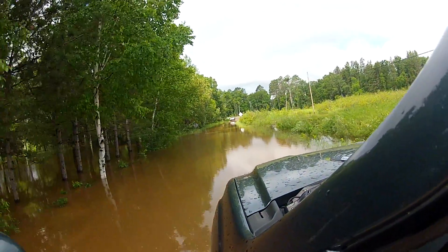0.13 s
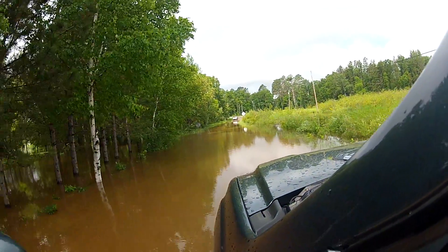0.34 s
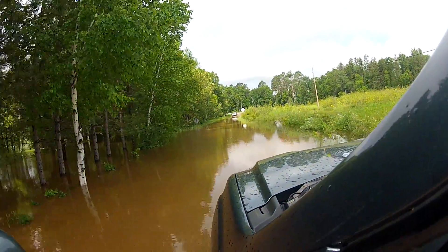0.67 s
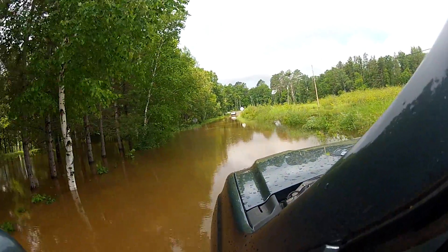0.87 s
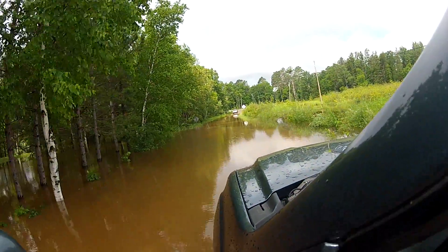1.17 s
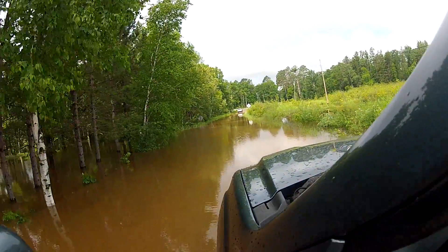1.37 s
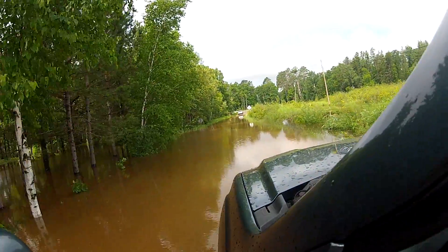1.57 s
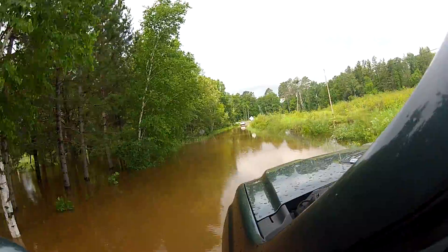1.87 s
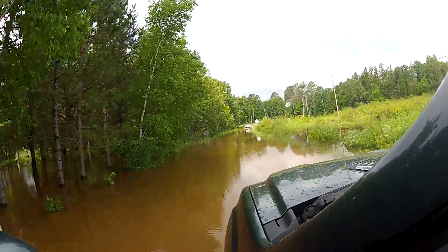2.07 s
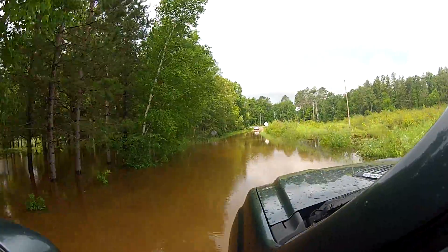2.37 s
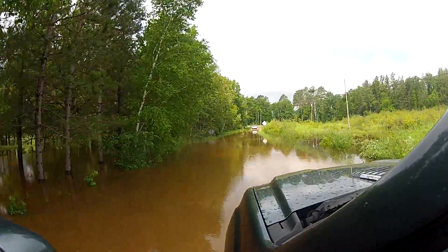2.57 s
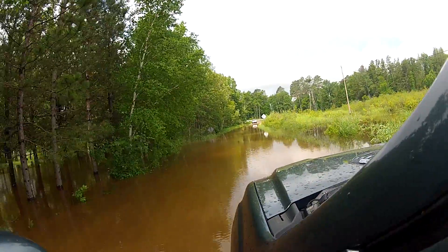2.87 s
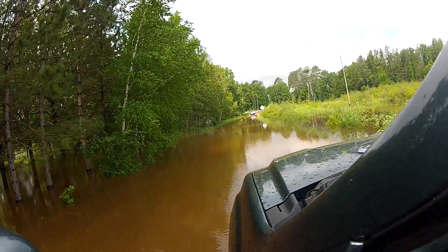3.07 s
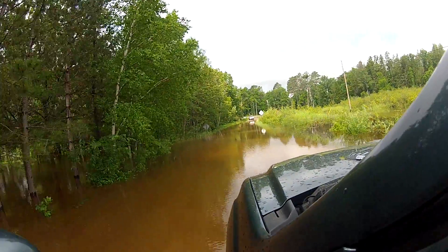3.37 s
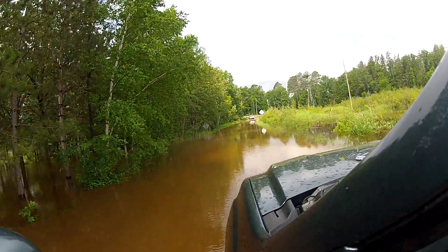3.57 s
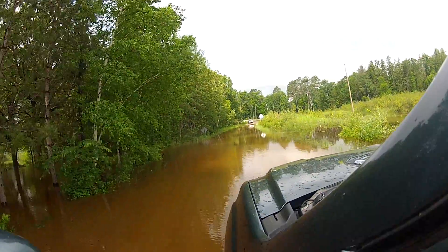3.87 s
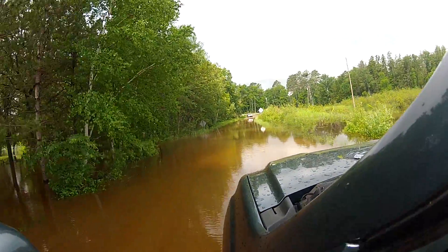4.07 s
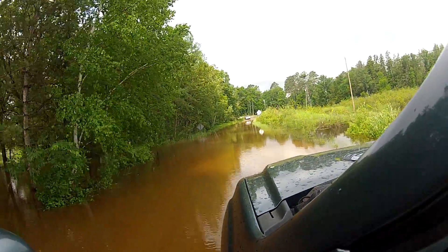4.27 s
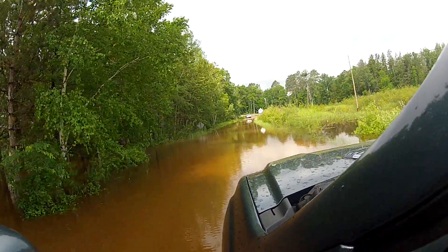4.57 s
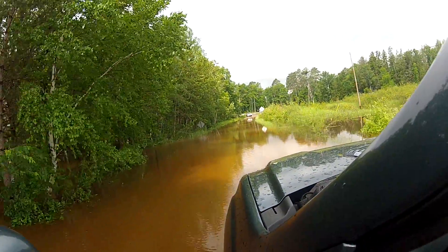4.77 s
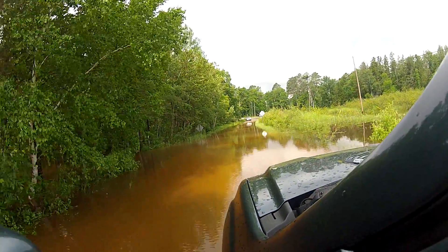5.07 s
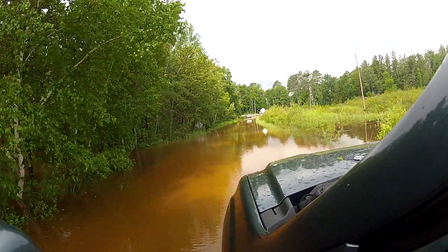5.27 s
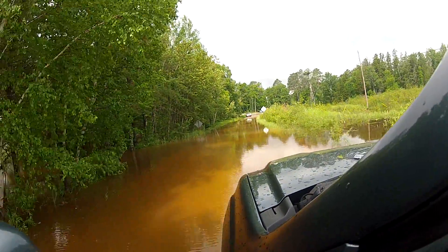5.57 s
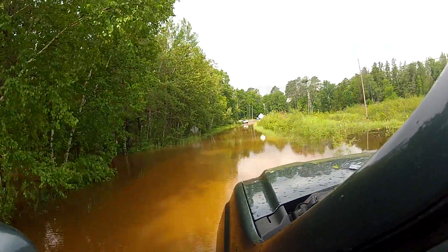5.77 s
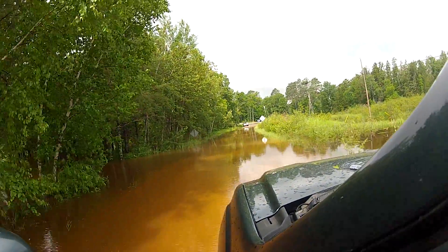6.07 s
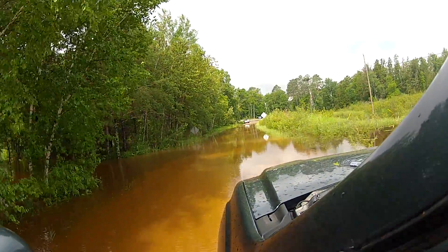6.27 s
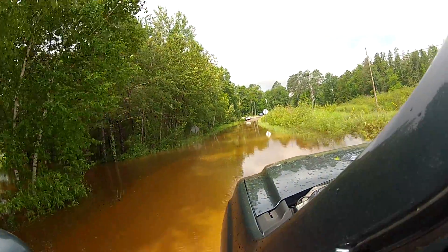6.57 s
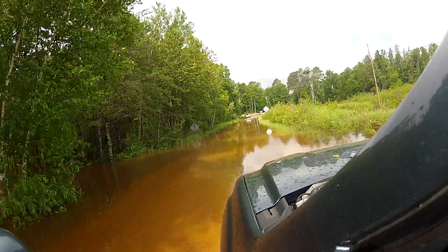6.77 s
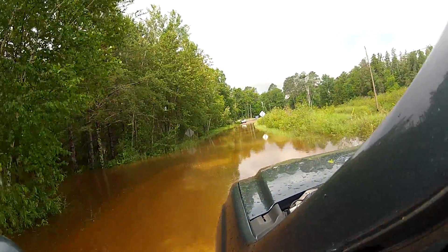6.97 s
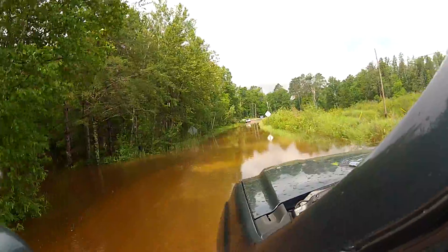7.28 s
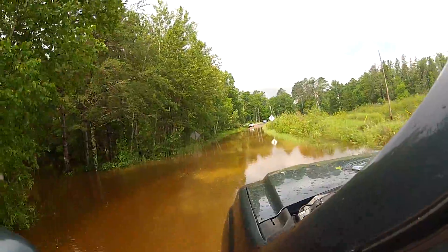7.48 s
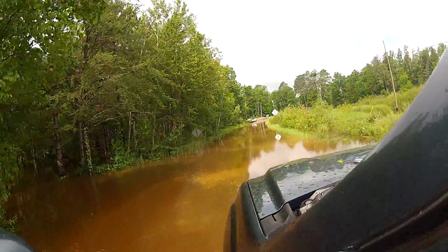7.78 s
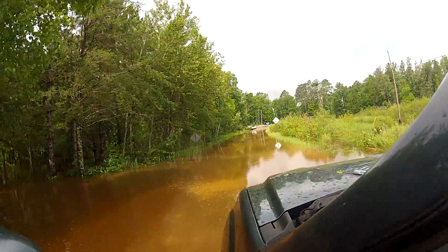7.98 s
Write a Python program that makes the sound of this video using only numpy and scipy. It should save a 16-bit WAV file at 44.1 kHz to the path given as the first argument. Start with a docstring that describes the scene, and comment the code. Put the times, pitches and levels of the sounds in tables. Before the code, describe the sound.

Close on the side of a truck driving through floodwater, heard through a sealed camera case. Tyre spray hisses and patters continuously over churning, sloshing water. A low engine hum, underwater tyre roll and shuddering body rumble sit beneath, swelling with soft jolts. Short knocks on the bodywork come in small groups early, the sharpest near three and four and a half seconds, then a few later. Large drops occasionally ping the case.

```python
"""Truck wading a flooded road

Heard from a closed camera case on the truck's side. Random impacts and wash, filtered by the case
resonances, make hissing, pattering tyre spray over churning and sloshing water; large drops ping it.
Below, engine orders hum, and shaped noise gives body rumble, tyre roll and soft bumps.
Now and then a knock on the bodywork thuds, rings a panel and rattles."""
import sys
import numpy as np
from scipy import signal
from scipy.fft import rfft, irfft, next_fast_len
from scipy.io import wavfile
from scipy.ndimage import uniform_filter1d

SR = 44100
rng = np.random.default_rng(int(sys.argv[2]) if len(sys.argv) > 2 else 0)


def unload_audio(sound):
    """Save the sound as a 16-bit wav file, at the path given as the first command line argument."""
    columns = np.transpose(np.atleast_2d(sound))
    # keep every value between -1 and 1, then stretch to whole-number steps
    steps = np.round(np.clip(columns, -1, 1) * 32767)
    wavfile.write(sys.argv[1], SR, steps.astype(np.int16))


N = 358526
TIME_S = np.arange(N) / SR

# body shaking on rougher and smoother road: t/s, level/dB
SHAKE_LEVEL = [(0, -41), (.7, -40), (2.0, -45), (2.5, -42.5), (4.6, -41), (6.35, -43), (6.58, -52),
               (6.9, -40), (8.13, -45)]
# jolts rocking the body on its springs: onset t/s, peak level/dB
BODY_JOLTS = [(.233, -34), (1.55, -34.5), (2.33, -41), (2.6, -41), (2.757, -37), (2.964, -39), (3.374, -36),
              (3.799, -43), (4.114, -39), (4.969, -34.5), (5.3, -37.5)]
# colour of the shaking: f/Hz, relative level/dB
SHAKE_COLOUR = [(4, -42), (12, -13.5), (24, -5.5), (37, 2.5), (50, -4), (62, -13), (75, -21), (100, -26.5),
                (200, -64)]
# colour of tyres rolling under water: f/Hz, relative level/dB
ROLL_COLOUR = [(30, -22), (60, 1), (80, -10), (105, -5.5), (150, -8), (215, -11), (320, -16.5), (900, -73)]
# wheels bumping on the drowned road: onset t/s, peak level/dB
WHEEL_BUMPS = [(1.134, -46.5), (2.187, -42.5), (3.715, -47), (4.209, -44.5), (4.7, -47)]
# mean engine firing rate: t/s, f/Hz
FIRING_RATE = [(0, 64.65), (.8, 62), (1.4, 62.8), (2.5, 61.48), (4.5, 63.17), (6.1, 61.5), (7.5, 63.6),
               (8.13, 65.75)]
# engine orders: multiple of firing rate/1, relative level/dB
ENGINE_ORDERS = [(1, 6.5), (1.5, -19), (2, -13.5), (3, -20), (4, -20)]
# knocks on the bodywork, before filtering: onset t/s, panel ring level/dB, dull thud level/dB
BODY_KNOCKS = [(0.265, -35, -42), (.458, -36.5, -42), (.679, -33.5, -45), (1.217, -38, -55),
               (1.926, -36.5, -38), (2.024, -33, -43), (2.207, -38, -38), (3.185, -36.5, -58),
               (3.196, -36, -54), (3.2105, -25.5, -42), (3.235, -38, -42), (3.247, -41, -36.5),
               (3.738, -35, -48), (4.469, -39, -36), (4.4862, -28.5, -27), (5.184, -34.5, -38),
               (6.881, -32, -42), (7.7309, -31, -28)]
# mean modes of the struck panel: f/Hz, relative level/dB, t60/s
PANEL_MODES = [(268, -21, .12), (354, -27, 0.089), (480, -33, 0.061), (710, -9, 0.028), (980, -1, 0.037),
               (1113, -5.5, 0.039), (1213, -21.5, 0.13)]
# resonances of the camera case: f/Hz, width scale/Hz, relative level/dB
CASE_MODES = [(272, 204, -8.5), (590, 1100, -13), (1050, 240, -6.5), (1252, 116, -6), (1524, 200, -20),
              (1892, 152, -6), (2128, 247, 1.5), (2278, 204, 0.5), (2610, 470, -13), (3108, 363, -2),
              (3666, 365, -9), (3990, 360, -15.5), (4588, 630, -13), (5390, 950, -23)]
# large drops hitting the case: onset t/s, driving pitch f/Hz, peak level/dB
LARGE_DROPS = [(.36, 4600, -46), (.9932, 2050, -31), (1.599, 2120, -32), (3.22, 2200, -33.5),
               (3.6357, 2157, -31.5), (5.2395, 3090, -35), (7.013, 2200, -34), (7.242, 2140, -34),
               (7.25, 2200, -39), (7.748, 2100, -33)]
# spray as the tyres push harder: t/s, level/dB
SPRAY_LEVEL = [(0, -45.4), (.7, -46), (1.9, -45.5), (2.5, -45), (3.3, -45), (4.5, -44.5), (5.2, -44.5),
               (8.13, -44)]
# deep slosh under the wheels: t/s, level/dB
SLOSH_LEVEL = [(0, -61.5), (1.3, -60), (3.0, -60.5), (3.8, -58), (4.5, -59.5), (5.7, -56), (6.5, -57.5),
               (8.13, -58)]

JOLT_RISE_S = 0.022
ENGINE_START_DB, ENGINE_GROWTH_DB_PER_S = -52, 0.45
CHURN_DB = -51
# recorder: mirror centre, gain on the mirrored slope, its low-pass corner, band limit
MIRROR_HZ, MIRROR_DB, MIRROR_DULL_HZ, EDGE_HZ = 12000, 7, 10100, 15320


def gain_of(db):
    """Decibels to amplitude gain."""
    return 10 ** (np.asarray(db) / 20)


def evened(x):
    """Scales to rms 1."""
    return x / np.sqrt(np.mean(x ** 2) + 1e-20)


def curve(rows):
    """Second column of a time table, interpolated at every sample."""
    rows = np.array(rows)
    return np.interp(TIME_S, rows[:, 0], rows[:, 1])


def add(mix, onset_s, sound):
    """Adds a sound in place from onset_s, cut at the end of the mix."""
    part = mix[round(onset_s * SR):][:len(sound)]
    part += sound[:len(part)]


def noise(shape):
    """Noise of rms 1, white noise weighted by the amplitude response shape(Hz)."""
    size = next_fast_len(N, True)
    spectrum = rfft(rng.standard_normal(size)) * shape(np.fft.rfftfreq(size, 1 / SR))
    return evened(irfft(spectrum, size)[:N])


def coloured(spectrum):
    """Noise of rms 1 shaped by (f/Hz, level/dB) points."""
    hz, db = np.transpose(spectrum)
    # f + 1 keeps the log finite at 0 Hz
    return noise(lambda f: gain_of(np.interp(np.log(f + 1), np.log(hz), db)))


def wander(hz):
    """Slow random fluctuation of rms 1, rolling off above about hz."""
    return noise(lambda f: f / (f + 1.0) / (1 + (f / hz) ** 2))


def band(x, low_hz, high_hz):
    """Butterworth band-pass."""
    return signal.sosfilt(signal.butter(4, [low_hz, high_hz], "band", fs=SR, output="sos"), x)


def rumble(roll_db=-57.5, roll_swell_db=1.0, sway_db=1.4):
    """The body shakes on its springs, harder just after each jolt, over the steadier roll of the tyres."""
    shake = coloured(SHAKE_COLOUR)
    # even out the noise so the road alone sets the swell
    shake = shake / np.sqrt(uniform_filter1d(shake ** 2, size=5000))
    power = gain_of(curve(SHAKE_LEVEL) + sway_db * wander(9)) ** 2
    age = np.arange(SR // 2) / SR / JOLT_RISE_S
    jolt = age * np.exp(1 - age)
    for onset_s, db in BODY_JOLTS:
        add(power, onset_s, (gain_of(db) * jolt) ** 2)
    roll = coloured(ROLL_COLOUR) * gain_of(roll_db + roll_swell_db * wander(10))
    return shake * np.sqrt(power) + roll


def bumps(rise_s=0.011):
    """A bump passes the suspension as a soft, low thump."""
    out, t = np.zeros(N), np.arange(SR // 4) / SR
    for onset_s, db in WHEEL_BUMPS:
        thump = band(rng.standard_normal(len(t)), 67, 190)
        thump = thump * t / rise_s * np.exp(-t / rise_s)
        add(out, onset_s, gain_of(db) * thump / abs(thump).max())
    return out


def engine():
    """Whole and half orders of the firing rate, each wavering a little."""
    rate_hz = curve(FIRING_RATE) * (1 + 0.0053 * wander(4.7))
    turns = np.cumsum(rate_hz) / SR  # phase in firing cycles
    hum = np.zeros(N)
    for order, db in ENGINE_ORDERS:
        tone = np.sin(2 * np.pi * (order * turns + rng.random()))
        hum += gain_of(db + 1.6 * wander(6.5)) * tone
    return evened(hum) * gain_of(ENGINE_START_DB + ENGINE_GROWTH_DB_PER_S * TIME_S)


def knocks(thud_hz=550, thud_s=0.00072, boom_hz=335, boom_db=-12, boom_s=0.012,
           rattle_db=-18, rattle_s=0.029, top_hz=1400, ring_rise_s=0.00067):
    """Each blow gives a short thud, rings the panel and the hollow behind it, and leaves a brief rattle."""
    body, t = np.zeros(N), np.arange(SR // 4) / SR
    for onset_s, ring_db, thud_db in BODY_KNOCKS:
        ring = np.zeros(len(t))
        for hz, db, t60_s in PANEL_MODES:
            mode_hz = hz * (1 + 0.025 * rng.standard_normal())  # differs from blow to blow
            ring += gain_of(db - 60 * t / t60_s) * np.sin(2 * np.pi * mode_hz * t)
        ring *= 1 - np.exp(-t / ring_rise_s)  # the blow takes a moment to spread over the panel
        thud = t / thud_s * np.exp(1 - t / thud_s) * np.sin(2 * np.pi * thud_hz * t)
        boom = gain_of(boom_db) * np.exp(-t / boom_s) * np.sin(2 * np.pi * boom_hz * t)
        rattle = evened(band(rng.standard_normal(len(t)), 230, 860))
        rattle = gain_of(rattle_db) * rattle * np.exp(-t / rattle_s)
        add(body, onset_s, gain_of(ring_db) * ring + gain_of(thud_db) * (thud + boom + rattle))
    # a small panel radiates little bass; the case shuts out the band just above its ring
    return signal.sosfilt(signal.butter(10, top_hz, fs=SR, output="sos"), band(body, 263, 4600))


def case_ring(leak_db=-41, dip_hz=6000, dip_width_hz=170, dip_db=-8):
    """Causal impulse response: steep case resonances over a faint leak, and a narrow dip at dip_hz."""
    size = 4096
    f = abs(np.fft.fftfreq(size, 1 / SR))
    power = gain_of(leak_db) ** 2
    for hz, width_hz, db in CASE_MODES:
        power = power + gain_of(db) ** 2 / (1 + 0.78 * ((f - hz) / width_hz) ** 2) ** 5
    # the dip lies between the sound and its mirrored sizzle
    dip = gain_of(dip_db * np.exp(-((f - dip_hz) / dip_width_hz) ** 2))
    gain = np.sqrt(power) * dip
    # minimum phase from the log gain
    response = np.exp(np.conj(signal.hilbert(np.log(gain))))
    return np.fft.ifft(response).real[:size // 2]


def drops(ring, contact_s=0.00087):
    """A large drop spreads on the case in about a millisecond and wakes resonances near its pitch."""
    out, t = np.zeros(N), np.arange(SR // 40) / SR
    for onset_s, hz, db in LARGE_DROPS:
        contact = t * np.exp(-t / contact_s) * np.sin(2 * np.pi * hz * t)
        tap = signal.oaconvolve(contact, ring)
        add(out, onset_s, gain_of(db) * tap / abs(tap).max())
    return out


def patter(per_s, spread_db):
    """Random impacts of rms 1, many small and a few large."""
    size = gain_of(spread_db * np.minimum(rng.exponential(1, N), 4))
    struck = rng.random(N) < per_s / SR
    return evened(size * rng.choice([-1, 1], N) * struck)


def water(ring):
    """Slosh, churn and spray: wash plus separate drops, surging as the tyres throw sheets of water."""
    surge = wander(12.0)  # shared by all three

    def layer(low_hz, high_hz, per_s, spread_db, wash_db, surge_db, flutter_db):
        """Drops and wash in one band, sounding through the case, at rms 1."""
        drive = patter(per_s, spread_db) + gain_of(wash_db) * noise(np.ones_like)
        drive = drive * gain_of(surge_db * surge + flutter_db * wander(61))
        return evened(band(signal.oaconvolve(drive, ring)[:N], low_hz, high_hz))

    slosh = layer(205, 466, per_s=300, spread_db=2.0, wash_db=3, surge_db=1.0, flutter_db=0.1)
    churn = layer(449, 1713, per_s=500, spread_db=3.5, wash_db=6.5, surge_db=0.9, flutter_db=0.57)
    spray = layer(1690, 6130, per_s=2200, spread_db=2.0, wash_db=4, surge_db=0.64, flutter_db=0.57)
    low = slosh * gain_of(curve(SLOSH_LEVEL)) + churn * gain_of(CHURN_DB)
    return low + spray * gain_of(curve(SPRAY_LEVEL))


def scene():
    """All sources at the one microphone."""
    ring = case_ring()
    mix = rumble() + bumps() + engine() + knocks() + drops(ring) + water(ring)
    return mix[None]


def record(dry):
    """Fast flutter of the recorder's timing adds a thin sizzle mirrored about MIRROR_HZ; then band limit."""
    # a small timing error adds the slope of the sound times the error
    mirrored = np.gradient(dry, axis=1) * np.cos(2 * np.pi * MIRROR_HZ * TIME_S)
    mirrored = signal.lfilter(*signal.butter(1, MIRROR_DULL_HZ, fs=SR), mirrored)
    limit = signal.firwin(1023, EDGE_HZ, window=("kaiser", 9), fs=SR)
    return signal.oaconvolve(dry + gain_of(MIRROR_DB) * mirrored, limit[None], "same")


dry = scene()
out = record(dry)
unload_audio(out)
```